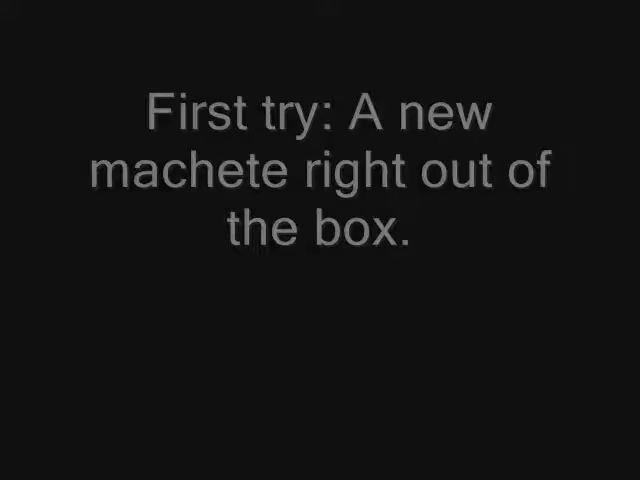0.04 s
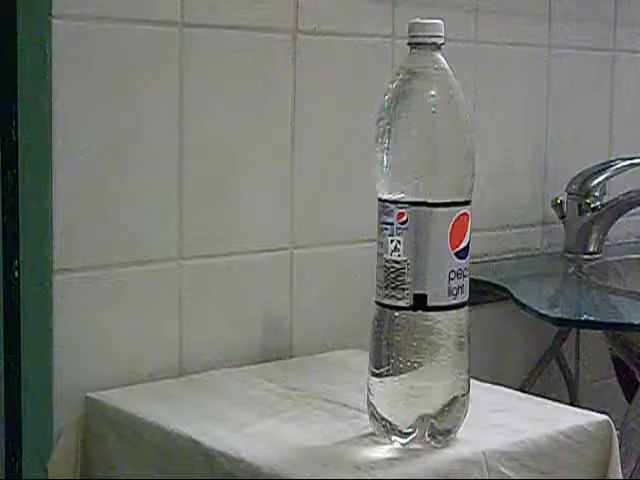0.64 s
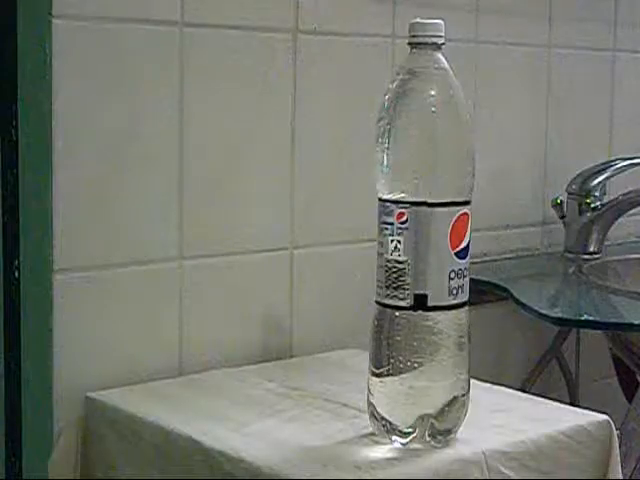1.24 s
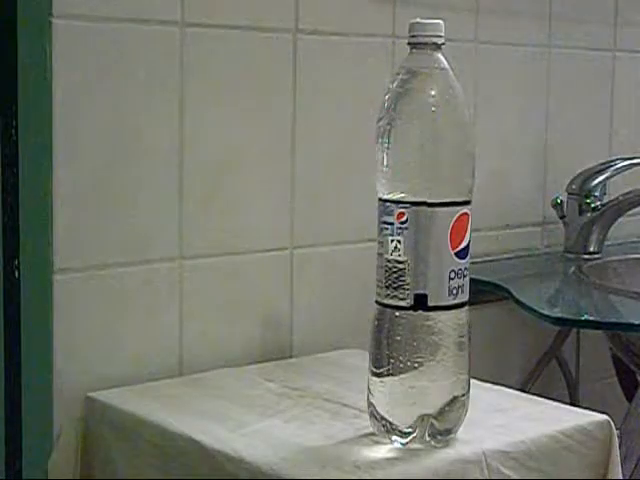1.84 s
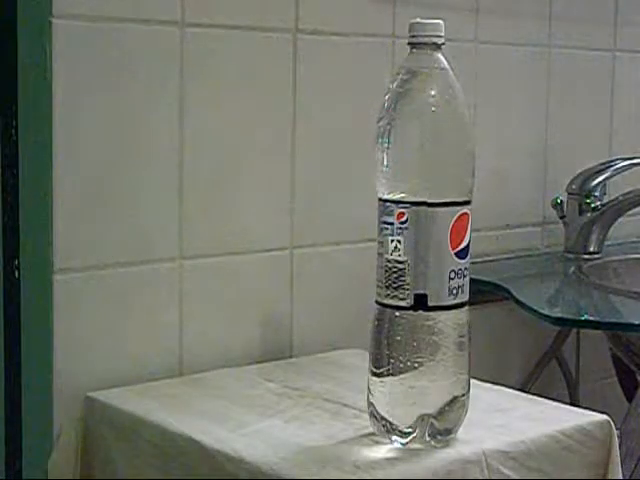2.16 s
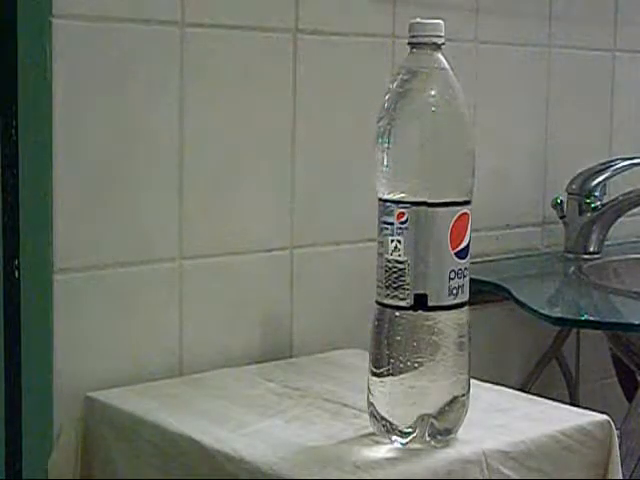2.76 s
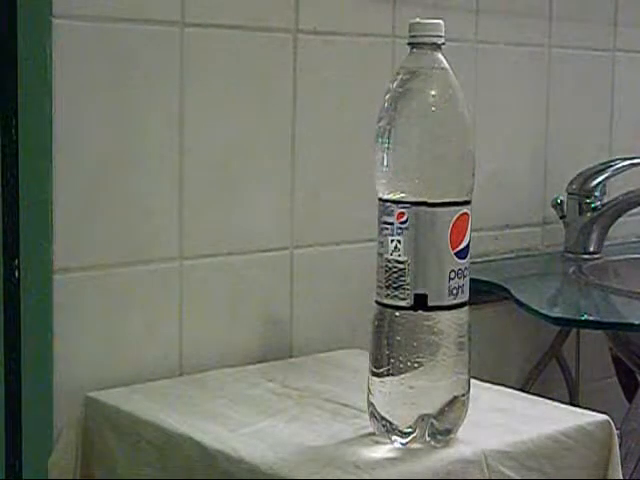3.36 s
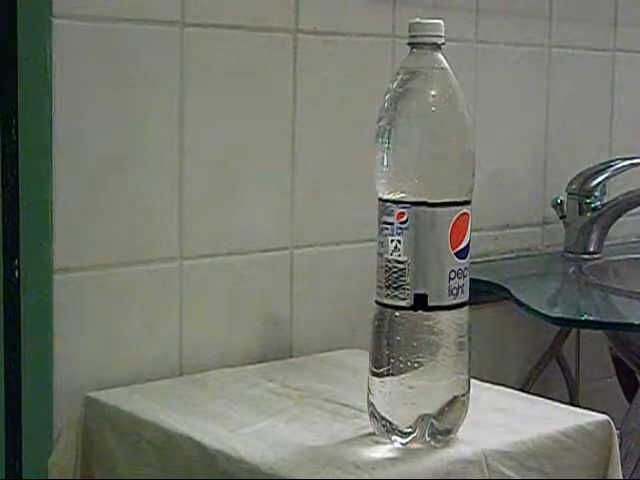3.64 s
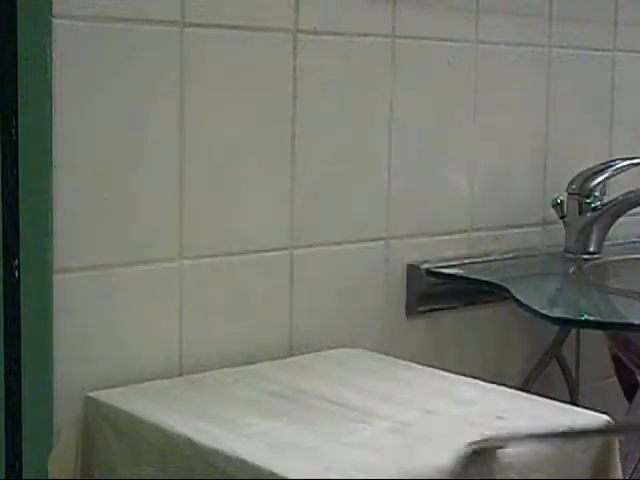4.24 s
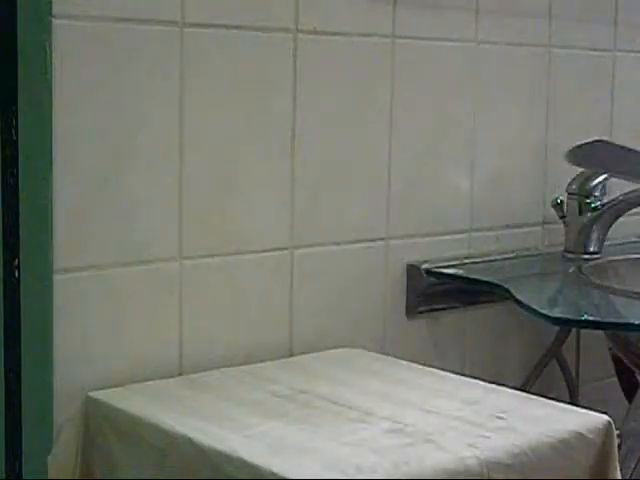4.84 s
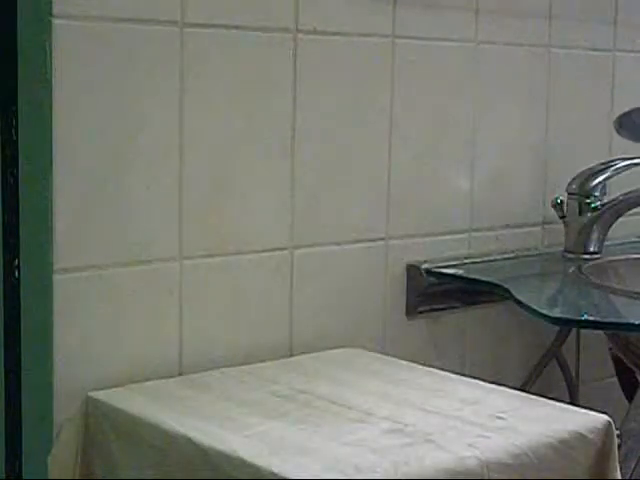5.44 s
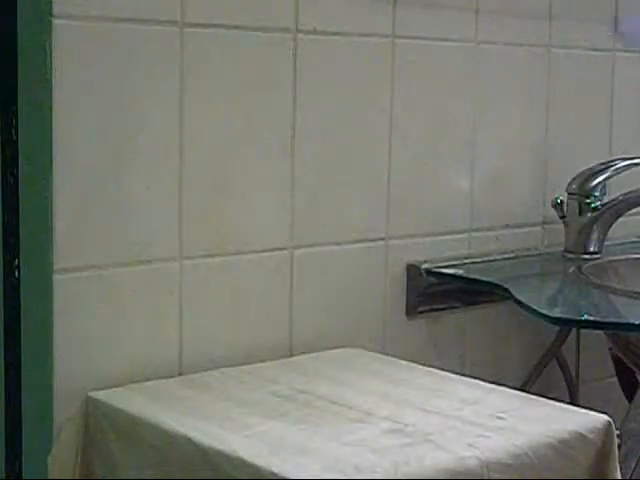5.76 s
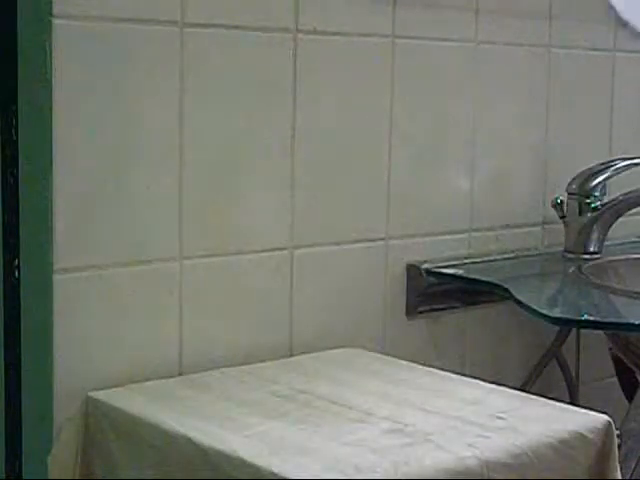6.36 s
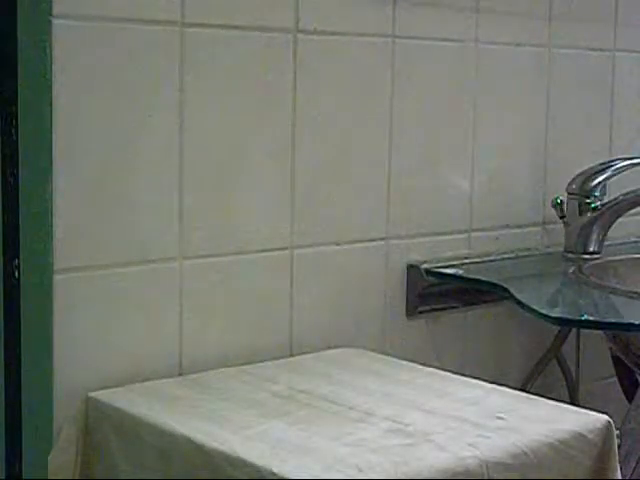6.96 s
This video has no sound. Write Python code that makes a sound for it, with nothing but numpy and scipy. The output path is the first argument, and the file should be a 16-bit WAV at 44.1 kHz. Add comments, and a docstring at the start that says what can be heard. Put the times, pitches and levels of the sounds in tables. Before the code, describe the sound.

A machete strikes a full plastic bottle with a ringing crack, and the bottle falls, bounces and rolls in a small tiled room.

```python
"""Machete against a full bottle

A machete swishes into a full plastic bottle on a table in a small tiled kitchen. The blade rings but does
not cut: the water thuds, the shell drums and crackles, and the bottle hits the wall, falls, bounces and
rolls out on the floor. We listen through a small camera, just switched on and still clicking from the
hand: air buffets its microphone, and its coarse, whining converter puts grit on everything."""
import sys
import numpy as np
from scipy import signal
from scipy.fft import rfft, irfft, next_fast_len
from scipy.io import wavfile
from scipy.ndimage import uniform_filter1d

SR = 44100
rng = np.random.default_rng(int(sys.argv[2]) if len(sys.argv) > 2 else 0)


def master(y):
    """Save y as 16-bit WAV."""
    cut = np.clip(np.atleast_2d(y).T, -1, 1)
    pcm = np.round(cut * 32767)  # scale
    wavfile.write(sys.argv[1], SR, pcm.astype(np.int16))


N = 313551
TIME = np.arange(N) / SR

# Table levels are relative: each layer is trimmed further in the mix.
# blade on bottle, the plastic folding round it, then two jolts as the bottle takes off:
# t/s, thud/dB, shell/dB, crackle/dB, crumple/s, give/s
CHOP_HITS = [(4.1378, -16.5, 0, 3.5, .0065, 0.0028), (4.147, -23.5, -4, -6.5, .006, 0.0018),
             (4.209, -44, -12, -38.5, .0086, 0.00056), (4.318, -19, -16, -40, .008, 0.0016)]
# ring-out of the water-filled bottle and the steel blade: f/Hz, level/dB, t60/s
CHOP_RING = [(179, -20, 0.81), (302, -17, 0.44), (414, -23.5, 1.8), (420, -39.5, 2.1), (598, -22.5, 0.92),
             (653, -20.5, 0.47), (730, -2, 0.033), (659, -24, 1.9), (797, -30, 0.67), (1013, -32.5, 2.1),
             (985, -20, .12), (3020, -27, 0.27), (3509, -49, .9), (4748, -44, 1.6), (5300, -45.5, 1.1)]
# the edge cracking into taut plastic: f/Hz, level/dB
CRACK_EQ = [(300, -19.5), (900, -3), (1400, 4.5), (2000, -1), (2800, 2), (3500, -1), (4400, 6.5),
            (5400, -2)]
# bottle on wall and floor: t/s, thud/dB, shell/dB, crackle/dB, crumple/s, give/s, floor boom/dB
LANDINGS = [(4.465, -38, -18.5, -19, 0.028, 0.0031, -56), (4.552, -17, -24, -30, 0.051, 0.00098, -16),
            (4.635, -25, -21.5, -19.5, 0.016, 0.0079, -48), (4.6713, -10, -14, -11.5, .005, .001, -34),
            (5.0, -12.5, -13, -13.5, 0.0097, 0.0064, -31.5),
            (5.311, -19.5, -21.5, -20.5, 0.021, 0.01113, -52),
            (5.519, -25.5, -23.5, -28, 0.031, 0.00966, -50), (5.645, -36, -33, -36, 0.057, 0.017, -60)]
# low thud and hollow drum of the bottle, its water and what it lands on: f/Hz, width/Hz, level/dB
THUD_PEAKS = [(75, 42, -3), (102, 27, 1.5), (171, 46, 5), (219, 36, 0.5), (311, 73, -8.5)]
SHELL_PEAKS = [(200, 61, -0.5), (333, 52, -1), (418.7, 92, 0.5), (612.7, 100, 3), (662, 110, 4.5),
               (848, 113, 2), (924, 88, 0.5), (1130, 103, -4.5)]
# snapping plastic: f/Hz, level/dB
CRACKLE_EQ = [(300, -15.5), (900, -6), (1400, -2.5), (2000, -5.5), (2700, -1), (3400, -7.5), (4400, 2.5),
              (5400, -16.5)]
# boom of the floor under the bottle: f/Hz, level/dB, t60/s
FLOOR_MODES = [(53.3, -2, 1), (110.6, 1.5, 0.36)]
# fingers on the camera case: t/s, thud/dB, knock/dB, tick/dB
TOUCHES = [(0.7167, -64, -23, -37), (0.8275, -68, -27.5, -41), (0.895, -66, -51, -44.5),
           (1.1244, -68, -31.5, -46), (1.2215, -21.5, -22, -30.5), (1.2523, -50, -30.5, -32),
           (1.256, -30, -21.5, -25.5), (1.296, -66, -35, -25)]
# the knocked case, and its button snapping back: f/Hz, level/dB, t60/s
CASE_MODES = [(682, -16.5, 0.06), (792, -12, 0.031), (907, -1.5, 0.016), (1210, -24, 0.027),
              (2020, -16, 0.03)]
BUTTON_MODES = [(2250, -42, 0.023), (2890, -18.5, 0.011), (3160, -28, 0.011), (4050, -55, .014)]
# fingers rubbing the case as the grip tightens: f/Hz, level/dB
GRIP_EQ = [(150, -2), (400, 6), (900, -1), (1800, -5), (2900, 1), (3800, -5), (5400, -9)]
# peaks of sleeve rustle as the blade is aimed and lifted: t/s, level/dB
SLEEVE_MOVES = [(2.61, -55.5), (2.87, -56.5), (3.59, -50.5)]
# colour of sleeve and swish: f/Hz, level/dB
SWISH_EQ = [(60, -7.5), (200, 2.5), (700, 9), (1400, 2), (2500, 3), (4300, 4.5), (5400, -2)]
# peaks of stirred air reaching the microphone: t/s, level/dB
AIR_PUFFS = [(4.14, -35.5), (4.66, -42.5), (5.19, -26), (5.86, -29.5)]
# rumble of that air: f/Hz, level/dB
BUFFET_EQ = [(18, 0.5), (32, -11), (55, -17.5), (110, -26), (250, -43.5), (600, -83)]
# reverb time of the tiled room: f/Hz, t60/s
ROOM_DECAY = [(60, 0.36), (200, 1), (500, 0.7), (1000, 0.8), (2000, 0.72), (5000, 0.45)]
# standing waves between the tiled walls: f/Hz, level/dB
STANDING_WAVES = [(113, -2.5), (183, -6), (304, -0.5), (404, -1.5), (454, 1), (550, -6.5), (586, -9.5),
                  (704, -6), (835, -5.5), (903, -3), (1058, -2)]
# background hush: f/Hz, level/dB
HUSH_EQ = [(20, 7.5), (40, -0.5), (80, 0.5), (150, -0.5), (300, -4), (800, -6.5), (1400, -13),
           (2000, -12.5), (3200, -15), (5400, -14.5)]
# third-octave band edges: f/Hz
BAND_EDGES = 16 * 2 ** np.arange(0, 8.6, 1 / 3) * 1.06


def chop(room, ring_db=1.5, room_db=-7.5, crack_room_db=-12.5, low_cut_hz=170):
    """The hero hit: the blow lands close to the microphone and leaves blade and bottle ringing."""
    thud, shell, crack = bottle(CHOP_HITS, CRACK_EQ, grain_db=-2.0, push_db=27.5, rap_db=24.5)
    body = butter(thud + shell, low_cut_hz, "high")  # a bottle in free air radiates little bass
    ring = through(clicks([CHOP_HITS[0][0]], [ring_db]), ringing(CHOP_RING))
    send = from_db(room_db) * body + from_db(crack_room_db) * crack
    return body + crack + ring + through(send, room)


def bottle(hits, snap_eq, grain_db, push_db, rap_db, slosh_db=-6.5, hard_give_s=0.002):
    """Three layers per hit: the mass of water thuds, the shell drums, the plastic buckles in snaps."""
    s, thud_db, shell_db, crackle_db, crumple, give = np.transpose(hits)
    # the water pushes once the shell has given way, then sloshes while the plastic crumples
    push = clicks(s + give, thud_db + push_db)
    slosh = bursts(s, thud_db + slosh_db, crumple, give) * rng.standard_normal(N)
    thud = butter(through(push + slosh, resonances(THUD_PEAKS)), hz=450, kind="low")
    # one sharp rap, softer for a slow give; then the crumpling keeps driving the shell
    rap = clicks(s, shell_db + rap_db - 20 * np.log10(1 + give / hard_give_s))
    crumpling = bursts(s, shell_db, crumple, give) * rng.standard_normal(N)
    shell = butter(through(rap + crumpling, resonances(SHELL_PEAKS)), hz=1500, kind="low")
    # a fast random gain breaks the noise into grains
    flicker = rms_one(uniform_filter1d(rng.standard_normal(N), size=40))
    snaps = rms_one(from_db(grain_db * flicker))
    crackle = bursts(s, crackle_db, crumple, give) * snaps * noise(snap_eq)
    return thud, shell, crackle


def tumble(room, direct_db=8.0, room_db=4.0, thud_db=9.5, thud_room_db=-3.5):
    """Landings, slaps and roll: the clatter splashes off the walls, the thuds carry through the floor."""
    landings, boom_db = np.array(LANDINGS)[:, :-1], np.array(LANDINGS)[:, -1]
    hits = np.vstack([landings, slaps(landings), roll()])
    thud, shell, crackle = bottle(hits, CRACKLE_EQ, grain_db=5.5, push_db=19, rap_db=19)
    clatter = shell + crackle
    boom = through(clicks(landings[:, 0], boom_db), ringing(FLOOR_MODES))
    # the floor radiates nothing far below its lowest mode
    floor = butter(from_db(thud_db) * thud + boom, hz=38, kind="high")
    echoes = through(from_db(room_db) * clatter + from_db(thud_room_db) * thud, room)
    return from_db(direct_db) * clatter + floor + echoes


def slaps(landings, delay_s=0.043, thud_db=-14.5, shell_db=-13.5, crackle_db=-14.5):
    """After each landing the bottle's other end slaps down, softer and more drawn out."""
    extra_crumple_s, extra_give_s = 0.003, 0.0016
    return landings + [delay_s, thud_db, shell_db, crackle_db, extra_crumple_s, extra_give_s]


def roll(count=5, start_s=5.686, step_s=0.073, loss_db=1.5, crumple_s=0.017, give_s=0.006):
    """Hits of the bottle rolling out: a knock at every part turn, fading ever faster."""
    layers_db = np.array([-53, -32.5, -34])  # thud, shell, crackle
    return [(start_s + step_s * turn, *(layers_db - loss_db * turn ** 2), crumple_s, give_s)
            for turn in range(count)]


def handling(room, room_db=-43, wall_s=0.0043, wall_db=-29):
    """Fingertips knock and rub the camera case and a button snaps; the nearest wall answers once."""
    settling = np.add(TOUCHES, [0.003, -27, -14, -13])  # each finger settles with a lighter touch
    s, thud_db, knock_db, tick_db = np.vstack([settling, TOUCHES]).T
    thud = through(clicks(s, thud_db), ringing([(410, 1.7, 0.0082)]))
    soft_fingertip = signal.butter(1, [600, 1700], "band", fs=SR, output="sos")
    knock = signal.sosfilt(soft_fingertip, through(clicks(s, knock_db + 2), ringing(CASE_MODES)))
    tick_eq = [(500, -21), (1500, -7), (2800, -1.5), (3600, -6.5), (4500, 2.0), (5400, 0.0)]
    tick = bursts(s, tick_db, decay_s=0.0032, attack_s=0.00042) * noise(tick_eq)
    button = through(clicks(s[-1:], 0), ringing(BUTTON_MODES))  # on the last touch
    rub = bursts(times=[1.221], levels_db=-42.5, decay_s=0.05, attack_s=0.0015) * noise(GRIP_EQ)
    direct = thud + knock + tick + button + rub
    reflection = from_db(wall_db) * np.interp(TIME - wall_s, TIME, direct)
    return direct + reflection + from_db(room_db) * through(direct, room)


def swing(rustle_width_s=0.093, swish_db=-35.5):
    """The sleeve rustles, then the swish grows as the blade speeds up and stops at the blow."""
    sleeve = sum(from_db(db) / (1 + ((TIME - s) / rustle_width_s) ** 2) for s, db in SLEEVE_MOVES)
    swish = swells([(CHOP_HITS[0][0], swish_db)], rise_db_per_s=190.5, fall_db_per_s=1302.5)
    return (sleeve + swish) * noise(SWISH_EQ)


def buffet(rise_db_per_s=381.5, eddy_db=-15.5):
    """Puffs of stirred air rumble on the microphone, each leaving weak, slowly dying eddies."""
    puffs = swells(AIR_PUFFS, rise_db_per_s, fall_db_per_s=122)
    eddies = from_db(eddy_db) * swells(AIR_PUFFS, rise_db_per_s, fall_db_per_s=29.5)
    return (puffs + eddies) * noise(BUFFET_EQ)


def kitchen(waves_db=-14.0, build_up_s=0.00067):
    """Room response: dense echoes off the tiles bloom and die band by band, over a few standing waves."""
    t = TIME[:2 * SR]
    tail = sum(np.sqrt(hz) * energy_one(band * from_db(-60 * t / at_hz(ROOM_DECAY, hz)))
               for hz, band in noise_bands(len(t)))
    waves = ringing([(hz, db, at_hz(ROOM_DECAY, hz)) for hz, db in STANDING_WAVES])
    reverb = energy_one(tail) + from_db(waves_db) * energy_one(waves)
    return energy_one(reverb * (1 - np.exp(-t / build_up_s)))


def hush(level_db=-55.5):
    """A faint, steady noise bed under the action."""
    return from_db(level_db) * noise(HUSH_EQ)


def clicks(times, levels_db):
    """One sample per contact."""
    out = np.zeros(N)
    out[np.round(np.asarray(times) * SR).astype(int)] = from_db(levels_db)
    return out


def bursts(times, levels_db, decay_s, attack_s):
    """Envelope of contacts that swell as the surface gives way, then die; overlaps add in power."""
    power, t = np.zeros(N), TIME[:SR // 2]
    for s, db, decay, attack in np.broadcast(times, levels_db, decay_s, attack_s):
        start = round(s * SR)
        envelope = from_db(db) * (1 - np.exp(-t / attack)) * np.exp(-t / decay)
        power[start:start + len(t)] += envelope ** 2
    return np.sqrt(power)


def swells(peaks, rise_db_per_s, fall_db_per_s):
    """A fader ride up to each peak (t/s, level/dB) and down again."""
    return sum(from_db(db - np.maximum(rise_db_per_s * (s - TIME), fall_db_per_s * (TIME - s)))
               for s, db in peaks)


def ringing(modes):
    """Decaying sines (f/Hz, level/dB, t60/s): a body's answer to one sharp blow."""
    t = TIME[:2 * SR]
    return sum(from_db(db - 60 * t / t60) * np.sin(2 * np.pi * hz * t) for hz, db, t60 in modes)


def resonances(peaks):
    """Impulse response of broad parallel resonances with alternating signs; energy 1."""
    t = TIME[:SR]
    modes = (from_db(db) * width * np.exp(-np.pi * width * t) * np.cos(2 * np.pi * hz * t)
             for hz, width, db in peaks)
    return energy_one(sum((-1) ** k * mode for k, mode in enumerate(modes)))


def noise(eq):
    """Steady noise shaped by an EQ curve (f/Hz, level/dB), up to the converter's limit; rms 1."""
    size = next_fast_len(N)
    hz = np.fft.rfftfreq(size, 1 / SR)
    gain = from_db(at_hz(eq, np.maximum(hz, 1))) * (hz > 10) * (hz < SR / 8)
    return rms_one(irfft(rfft(rng.standard_normal(size)) * gain, size)[:N])


def noise_bands(size):
    """Third-octave bands of unrelated noise: centre/Hz, samples."""
    for low, high in zip(BAND_EDGES, BAND_EDGES[1:]):
        band = butter(rng.standard_normal(size + SR // 2), [low, high], "band")[SR // 2:]
        yield np.sqrt(low * high), rms_one(band) * np.sqrt(high - low)


def through(x, response):
    """x as heard through an impulse response."""
    return signal.oaconvolve(x, response)[:N]


def butter(x, hz, kind):
    return signal.sosfilt(signal.butter(2, hz, kind, fs=SR, output="sos"), x)


def at_hz(curve, hz):
    curve_hz, values = np.transpose(curve)
    return np.interp(np.log(hz), np.log(curve_hz), values)


def from_db(db):
    return 10 ** (np.asarray(db) / 20)


def rms_one(x):
    return x / np.sqrt(np.mean(x ** 2) + 1e-20)


def energy_one(x):
    return x / np.sqrt(np.sum(x ** 2) + 1e-20)


def scene():
    """All layers meet at one microphone, which feeds both channels."""
    room = kitchen()
    mono = chop(room) + tumble(room) + handling(room) + swing() + buffet() + hush()
    return np.array([mono, mono])


def record(dry):
    """The converter switches on, whines, overloads and holds samples, mirroring sound into the treble."""
    whine_hz, whine_db = 5359.8, -55
    switch_on_s, hold_samples, cutoff_hz = 0.621, 4, 15400
    whine = from_db(whine_db) * np.sqrt(2) * np.sin(2 * np.pi * whine_hz * TIME)
    live = np.clip(dry + whine, -1, 1) * (TIME > switch_on_s)
    left, right = np.repeat(live[:, ::hold_samples], hold_samples, axis=1)[:, :N]
    left = np.pad(left, (hold_samples, 0))[:N]  # the left channel runs one held sample late
    high_cut = signal.ellip(10, 0.2, 70, cutoff_hz, fs=SR, output="sos")
    return signal.sosfilt(high_cut, [left, right])


dry = scene()
out = record(dry)
master(out)
```